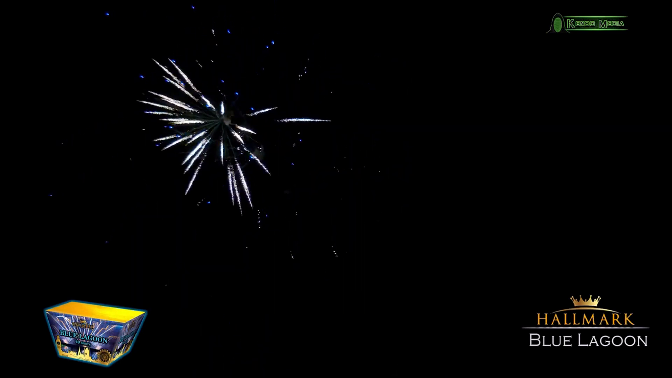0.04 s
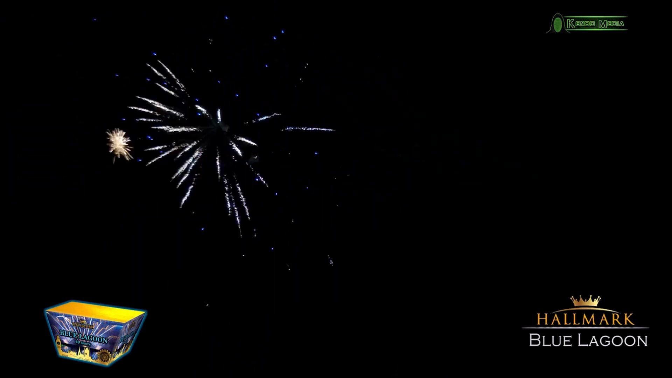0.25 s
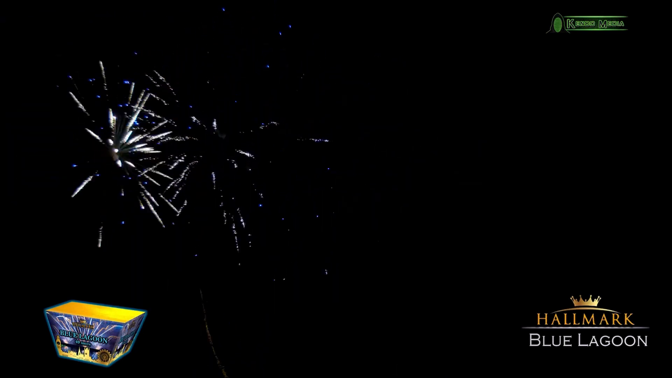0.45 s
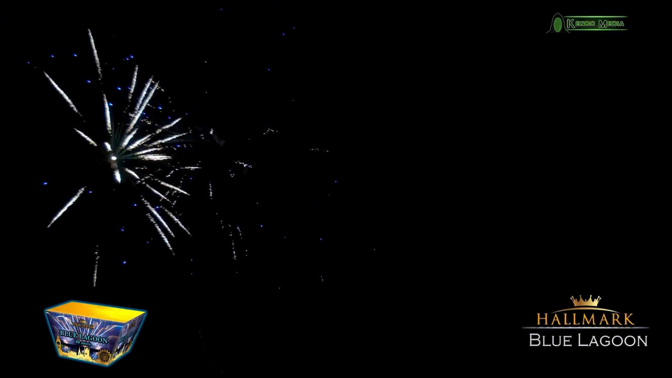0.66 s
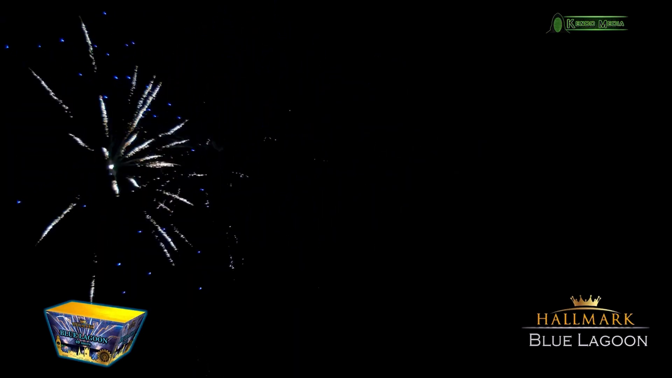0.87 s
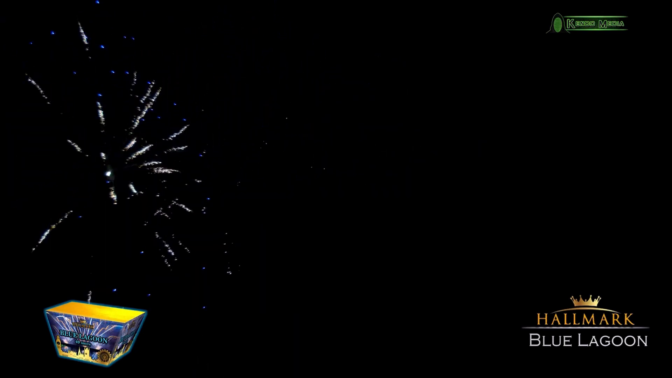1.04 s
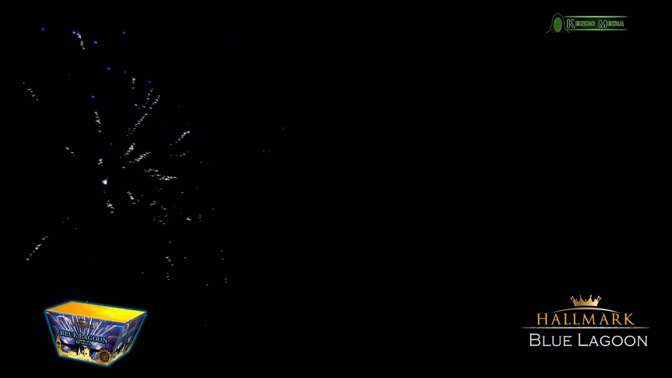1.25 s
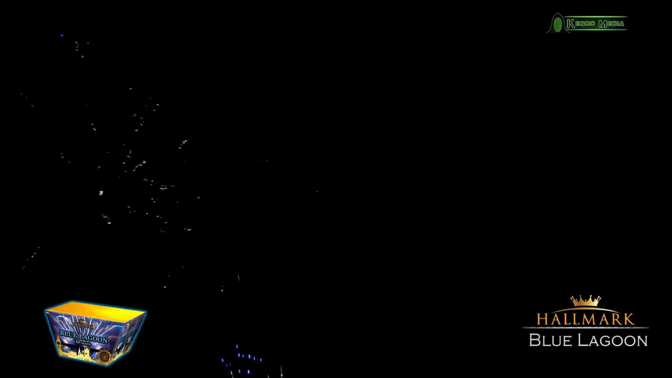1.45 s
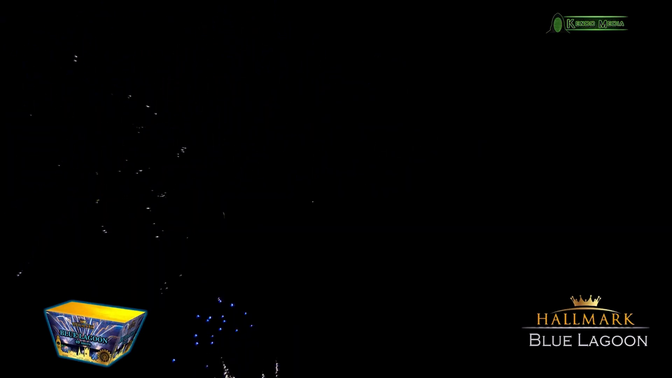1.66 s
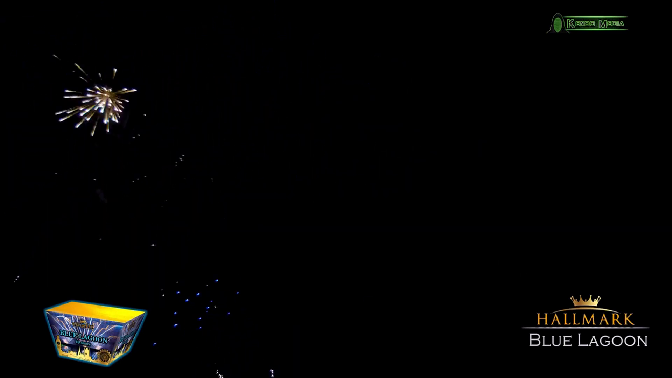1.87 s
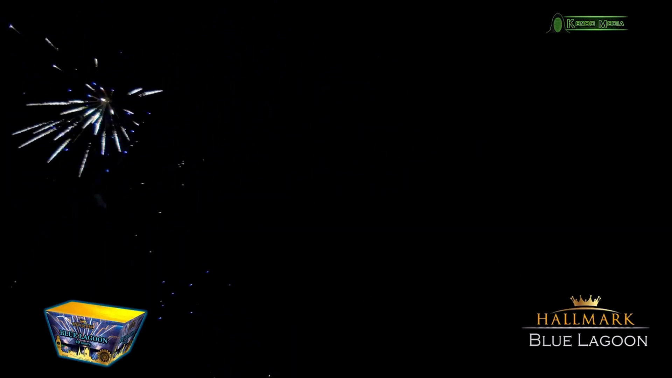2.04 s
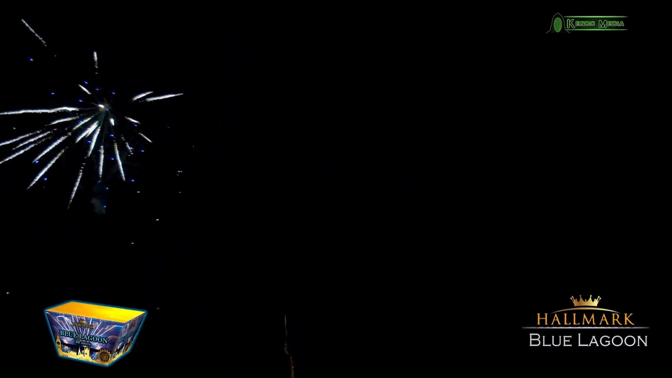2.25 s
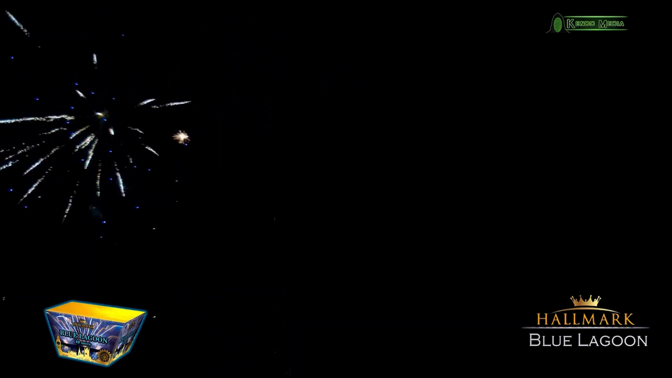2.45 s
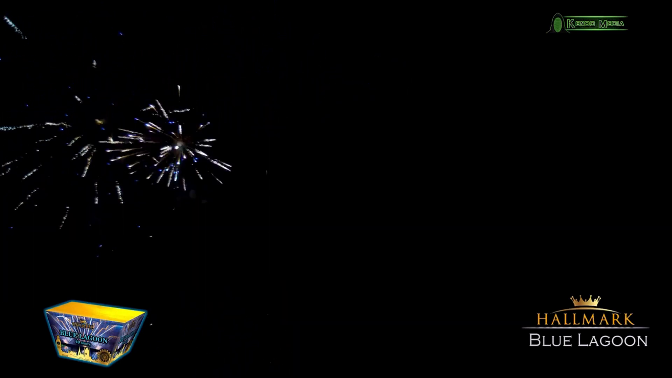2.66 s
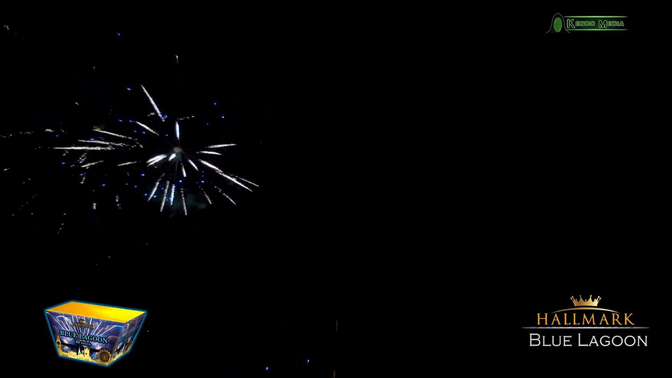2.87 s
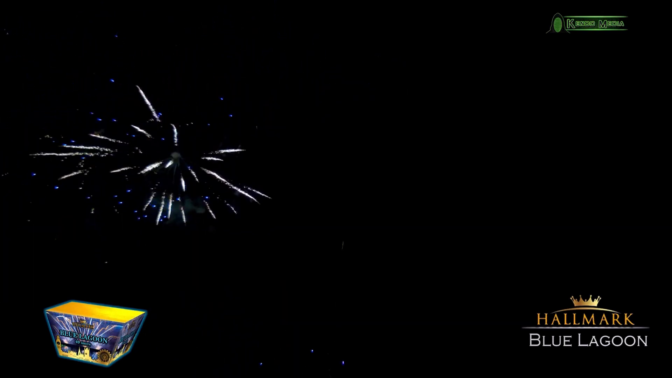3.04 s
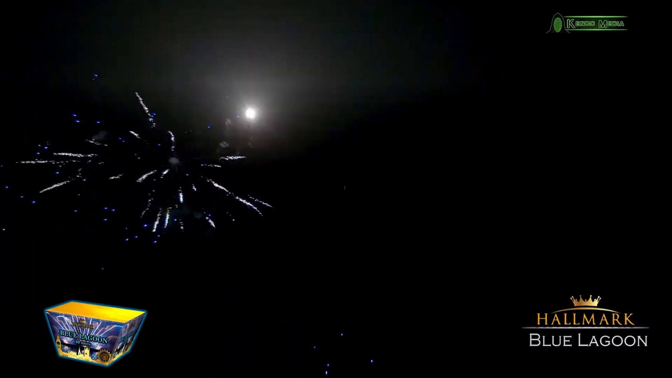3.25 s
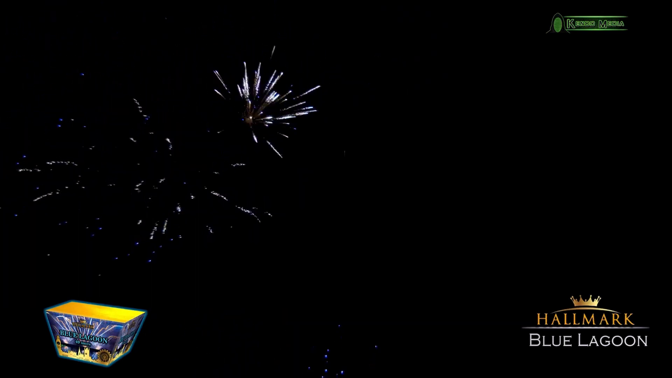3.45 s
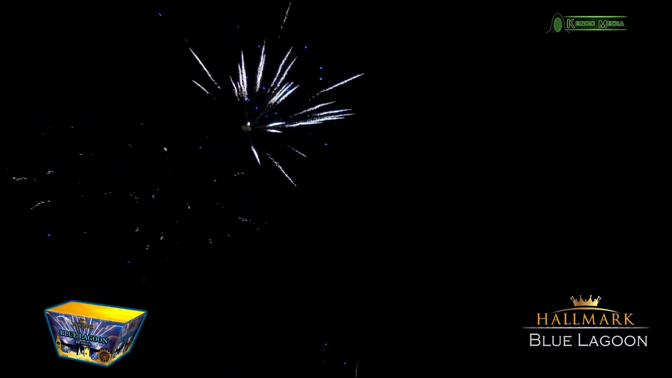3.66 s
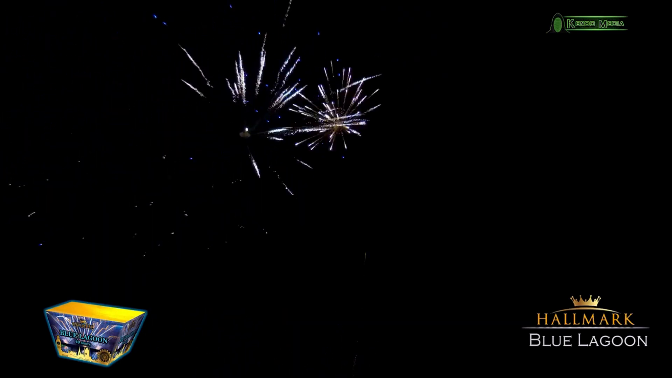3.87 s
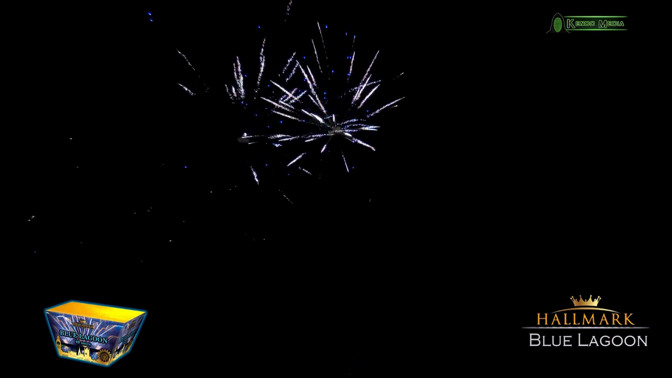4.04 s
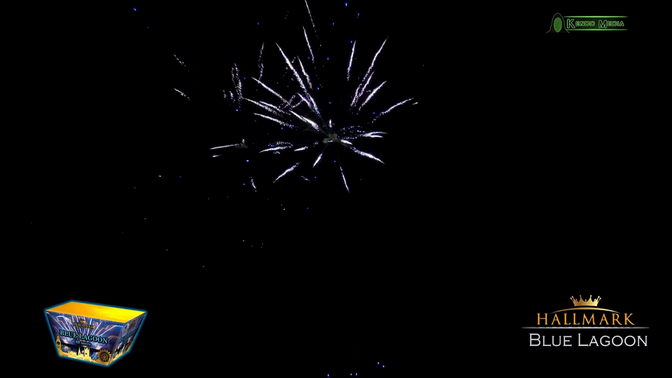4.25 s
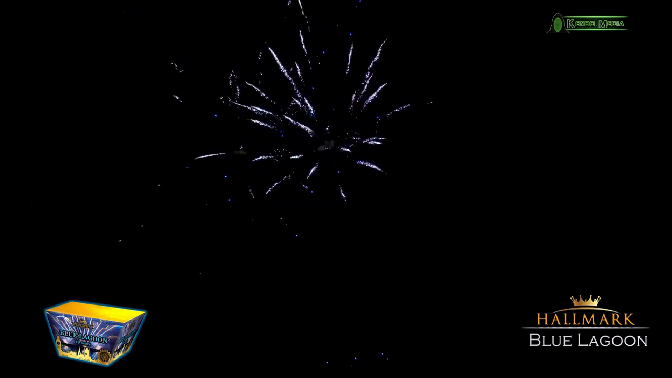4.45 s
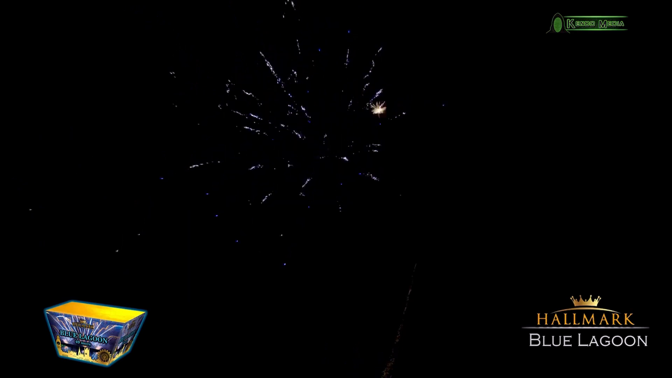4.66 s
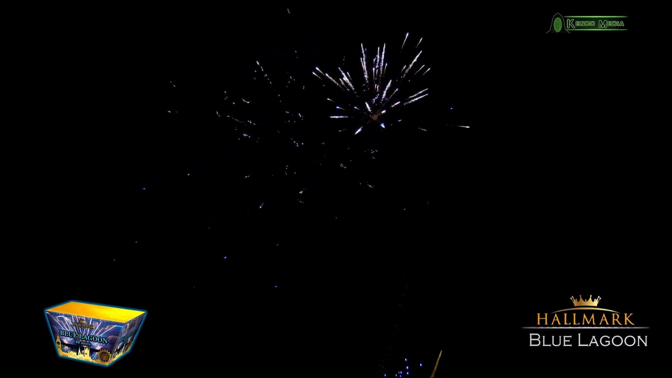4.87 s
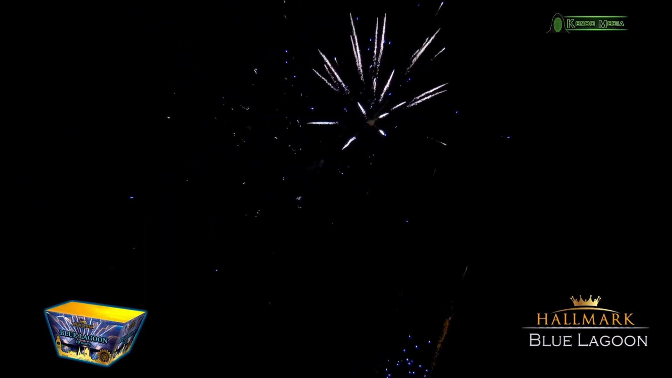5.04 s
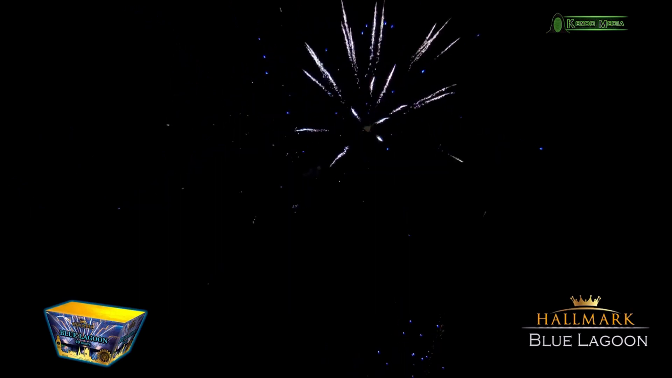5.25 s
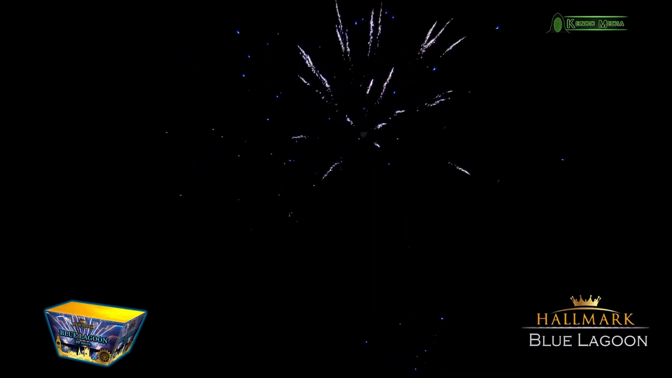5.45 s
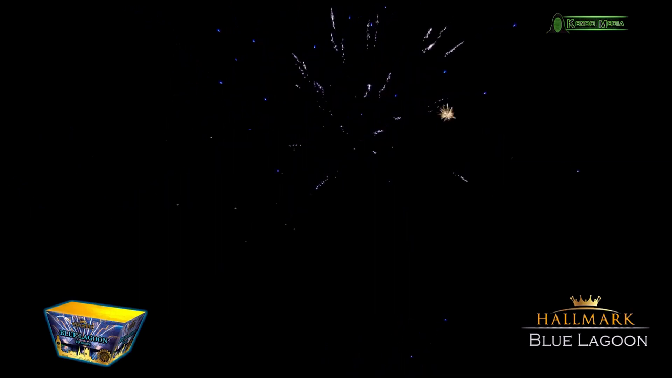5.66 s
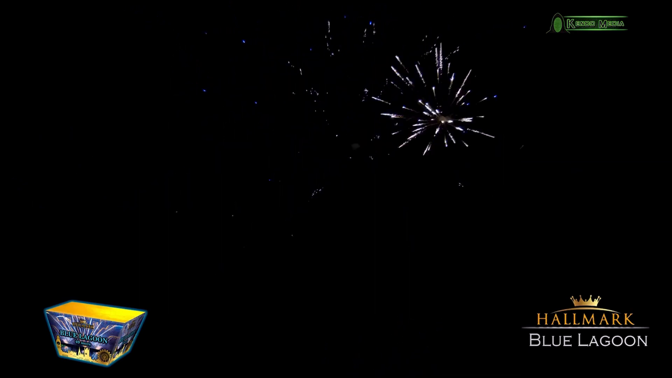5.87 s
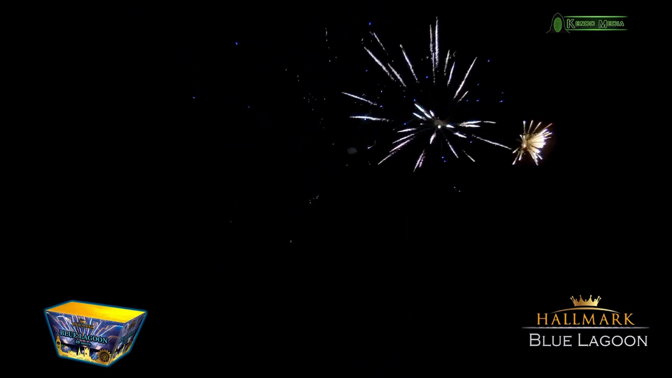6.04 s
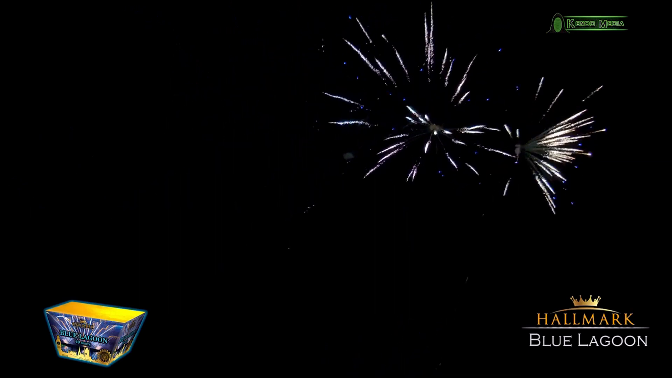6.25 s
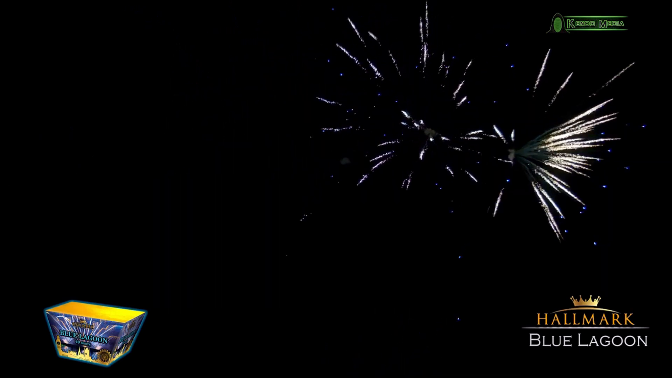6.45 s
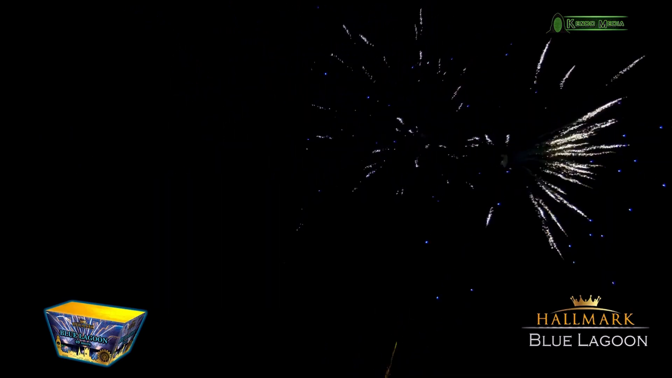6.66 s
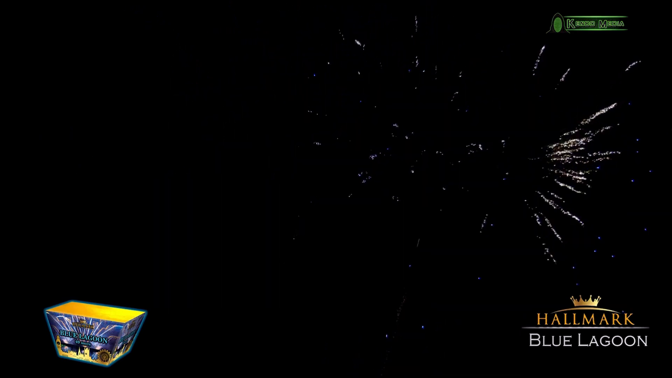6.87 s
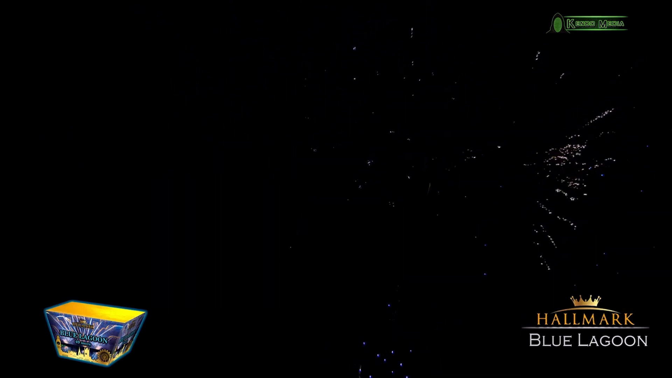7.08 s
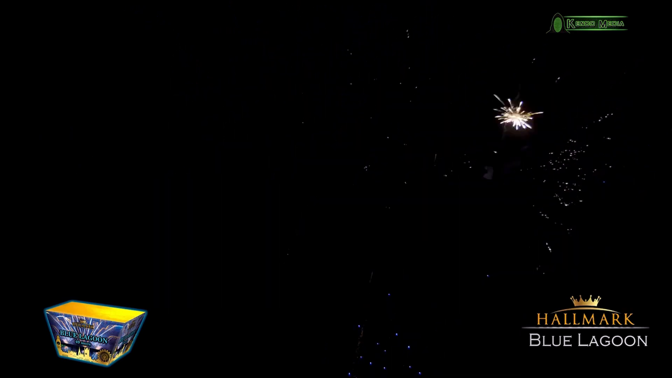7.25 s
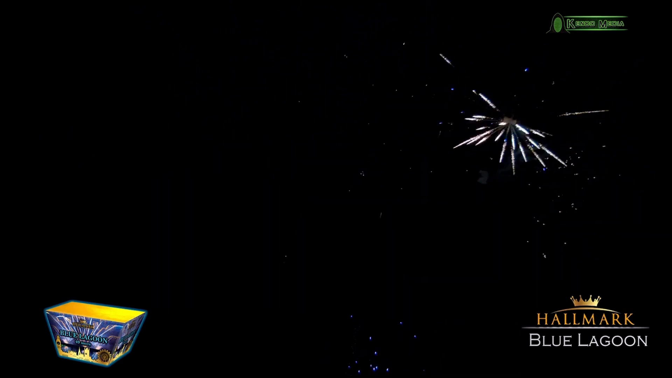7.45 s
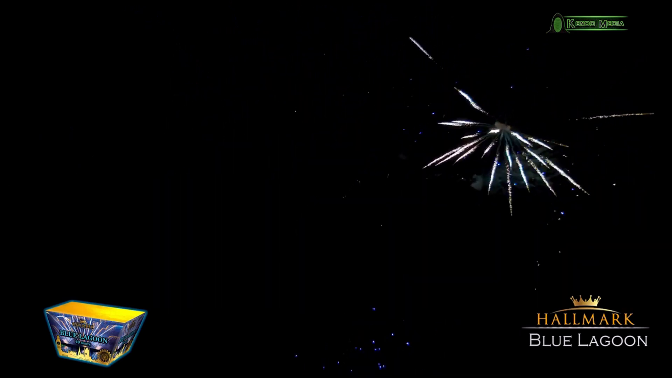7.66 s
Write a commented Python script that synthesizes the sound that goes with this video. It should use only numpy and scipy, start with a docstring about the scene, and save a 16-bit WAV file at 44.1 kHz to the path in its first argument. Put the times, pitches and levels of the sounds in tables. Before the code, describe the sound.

A multi-shot firework cake fires in an open field. Shells leave their tubes with hollow, cracking thumps and a faint upward swish, while others burst high overhead in sharp, loud bangs. The blasts come unevenly, often in quick pairs, each followed by a booming, hissing echo from ground and trees. Spent stars tick faintly and light wind rumbles on the low, widely spaced microphones, which overload on the loudest bangs.

```python
"""A field at night, three microphones 9 m apart and low over the grass, facing a firework cake.
A light wind rumbles, and ground and trees are still throwing back a burst as a hissing echo. Then a shell
thumps out of its tube and rushes upward; another bursts some 55 m overhead. Each blast reaches the
microphones in turn, a burst with its ground bounce; the loudest overload them, and all leave an echo.
Spent stars tick faintly as the cake fires on, its bursts fanning from left to right."""
import sys
import numpy as np
from scipy import signal
from scipy.fft import rfft, irfft, next_fast_len
from scipy.io import wavfile
from scipy.ndimage import map_coordinates

SR = 44100
rng = np.random.default_rng(int(sys.argv[2]) if len(sys.argv) > 2 else 0)


def dump_mix(stems):
    """Bounce the given channels to the path in sys.argv[1] as a 16-bit WAV at rate SR."""
    frames = np.atleast_2d(stems).T  # one column per channel
    limited = np.clip(frames, -1, 1)  # hard clip at full scale
    pcm = np.round(limited * 32767).astype(np.int16)
    wavfile.write(sys.argv[1], SR, pcm)


N = 340011

# shells bursting overhead:
# (time at the centre microphone [s], distance to the right [m], height [m], echo [dB])
BURSTS = [ (-0.115, -20, 56, -2), (0.5285, -24.5, 48, 1.5), (2.1141, -31.3, 61.5, -1.5),
          (2.7977, -19.9, 55.5, -1), (3.5769, -12, 61, -0.5), (4.0450, 0, 53, 0), (4.9812, 4.7, 60.5, 0),
          (5.9973, 13.3, 55.5, -1), (6.3048, 24, 56.5, 1), (7.5277, 22.6, 58, 0)]
# lift charges firing in the tubes:
# (time [s], thump [dB], thump pitch [Hz], crack [dB], echo [dB], swish pitch [Hz], swish [dB])
LIFTS = [ (0.4082, 3.5, 275, -2, 3.5, 2780, -53.5), (1.3507, 2.5, 263, -0.5, 3, 3000, -51),
         (2.195, 0.5, 282.4, -3.5, -1, 2530, -54.5), (2.8416, 3, 285.7, -2, 1.5, 2800, -58),
         (3.6945, 1, 274, -5.5, 0.5, 2400, -50.5), (4.5020, -1, 292, -7, -1, 2200, -55),
         (4.862, 1.5, 288, -2.5, 0.5, 2465, -48.5), (6.1305, 2.5, 290, -3, 4.5, 2190, -54.5),
         (6.6774, -0.5, 271, -4, 1, 2000, -56.5), (7.1102, 0.5, 284, -4.5, -0.5, 2080, -52)]
# what throws a blast back: close ground, nearest trees, deep wood, distant tree line, open country
# (delay [s], rise [s], hold [s], t60 [s], burst boom [dB], burst hiss [dB], lift boom [dB], lift hiss [dB])
REFLECTORS = [ (0, .001, 0.0039, .19, -19, -26.5, -25, -34.5),
              (0.0654, .005, 0.0065, .13, -28.5, -34.5, -37.5, -34.5),
              (0.083, .05, .085, .33, -39, -41, -50.5, -52),
              (.32, 0.018, .01, 0.28, -63, -58.5, -77.5, -81),
              (0.15, .1, 0.025, 1.8, -55.5, -56.5, -64, -67)]


def amp(db):
    """Decibels to gain."""
    return 10 ** (np.asarray(db) / 20)


def unit(x):
    """x at rms 1."""
    return x / np.sqrt(np.mean(x ** 2) + 1e-20)


def colour(points, hz):
    """Gain at hz of a curve of (frequency [Hz], level [dB]) points on a log axis."""
    knots_hz, db = np.transpose(points)
    return amp(np.interp(np.log(hz + 1), np.log(knots_hz + 1), db))


def filtered(x, response):
    """x with its spectrum multiplied by response(hz)."""
    size = x.shape[-1]
    padded = next_fast_len(size + 8192)
    return irfft(rfft(x, padded) * response(np.fft.rfftfreq(padded, 1 / SR)), padded)[..., :size]


def pole(x, hz, kind):
    """A causal first-order low-pass or high-pass."""
    return signal.lfilter(*signal.butter(1, hz, kind, fs=SR), x)


def noise(response, size, side_db, spiky=1):
    """Coloured stereo noise of rms 1; spiky above 1 gathers it into separate slaps."""
    white = rng.standard_normal((2, size))
    mid, side = filtered(np.sign(white) * np.abs(white) ** spiky, response)
    return unit(np.array([mid + amp(side_db) * side, mid - amp(side_db) * side]))


def wobble(per_s, size):
    """A smooth random curve through per_s knots a second."""
    knots = rng.standard_normal(int(size * per_s / SR) + 4)
    return map_coordinates(knots, [np.arange(size) * per_s / SR])


def overload(x, top, hardness):
    """Peaks flatten against a ceiling."""
    return x / (1 + np.abs(x / top) ** hardness) ** (1 / hardness)


def add(track, start_s, x):
    """Mix x into track from start_s, dropping what falls outside."""
    start = round(start_s * SR)
    first, end = max(start, 0), min(start + x.shape[-1], N)
    if end > first:
        track[..., first:end] += x[..., first - start:end - start]


def night_wind():
    """Wind rumbles at the microphones in gusts and quick buffets, over the faint hush of the field."""
    # gusts at the microphones: (time [s], level [dB])
    gusts = [(0.0, -44.5), (0.96, -48.5), (1.92, -42.5), (2.08, -49.5), (2.4, -39.5), (3.2, -48),
             (3.52, -53.5), (3.76, -49), (4.88, -54), (5.28, -49), (5.92, -50.5), (6.8, -46.5),
             (6.96, -40.5), (7.36, -45), (7.7, -54.6)]
    # spectrum of the wind rumble: (frequency [Hz], level [dB])
    rumble_colour = [(15, -13), (30, -6), (50, 0.5), (70, -1.5), (110, -12), (170, -22.5), (300, -39),
                     (900, -68.5)]
    # spectrum of the night air: (frequency [Hz], level [dB])
    air_colour = [(100, -9), (200, -4), (400, -10.5), (1200, -10.5), (3000, -22), (8000, -25.5),
                  (12000, -29.5), (16000, -38)]
    gust_db = np.interp(np.arange(N) / SR, *np.transpose(gusts))
    buffet_db = 2 * wobble(per_s=17, size=N)
    rumble = noise(lambda hz: colour(rumble_colour, hz), N, side_db=-9.5)
    hush = noise(lambda hz: colour(air_colour, hz), N, side_db=-8)
    return amp(gust_db + buffet_db) * rumble + amp(-66.5) * hush


def echo_envelope(t, levels_db):
    """Each reflector's answer swells, holds and dies away, and their powers add."""
    power = np.zeros(len(t))
    for (delay, rise, hold, t60, *_), db in zip(REFLECTORS, levels_db):
        swell = np.exp(-(np.minimum(t - delay, 0) / rise) ** 2)
        release = amp(-60 * np.maximum(t - delay - hold, 0) / t60)
        power += (amp(db) * swell * release) ** 2
    return np.sqrt(power)


def echo(boom_db, hiss_db, spectrum, ragged_db, clump_db):
    """Ground and trees scatter a blast back as a low boom and a hiss; both dull with distance."""
    length_s, rattle_s, dulling_s = 1.1, .06, .39
    crossover_hz, rattle_low_hz, thud_top_hz, air_top_hz = 1000, 260, 810, 8500
    t = np.arange(int(length_s * SR)) / SR
    lows = lambda hz: 1 / (1 + (hz / crossover_hz) ** 4)
    # the ground answers with a dense rattle, the trees with separate round thuds
    rattle_band = lambda hz: colour(spectrum, hz) * lows(hz) * hz / (hz + rattle_low_hz)
    thud_band = lambda hz: colour(spectrum, hz) / (1 + (hz / thud_top_hz) ** 4)
    rattle = noise(rattle_band, len(t), side_db=-7, spiky=1.5)
    thuds = noise(thud_band, len(t), side_db=-7, spiky=4.5)
    near = np.exp(-t / rattle_s)
    boom = np.sqrt(near) * rattle + np.sqrt(1 - near) * thuds
    # late echoes have crossed more air and lost their treble
    bright = noise(lambda hz: colour(spectrum, hz) * (1 - lows(hz)), len(t), side_db=-8, spiky=2.1)
    dull = unit(filtered(bright, lambda hz: np.exp(-(hz / air_top_hz) ** 2)))
    far = np.clip(t / dulling_s, 0, 1)
    hiss = (1 - far) * bright + far * dull
    # single trunks roughen the echo, clumps of trees make it swell and sink
    scatter = amp(ragged_db * wobble(130, len(t)) + clump_db * wobble(32, len(t)))
    return scatter * (boom * echo_envelope(t, boom_db) + hiss * echo_envelope(t, hiss_db))


def echoes():
    """Every blast wakes its own echo from the same ground and trees."""
    # spectrum of a burst's echo: (frequency [Hz], level [dB])
    burst_colour = [(41, -29.5), (70, -4), (155, -4), (190, -4), (321, -1), (977, -15.5), (1510, -14.5),
                    (1890, -18.5), (2270, -18.5), (3040, -20), (7220, -22), (12500, -30.5), (16000, -42.5)]
    # spectrum of a lift charge's echo: (frequency [Hz], level [dB])
    lift_colour = [(59, -36.5), (100, -3.5), (234, -3), (302, -2.5), (335, -2.5), (471, -14.5),
                   (1200, -24.5), (1950, -15), (2520, -16), (3700, -13.5), (4200, -17.5), (6700, -15.5),
                   (11900, -23), (16000, -39)]
    out = np.zeros((2, N))
    *_, burst_boom_db, burst_hiss_db, lift_boom_db, lift_hiss_db = np.transpose(REFLECTORS)
    for time_s, *_, echo_db in BURSTS:
        tail = echo(burst_boom_db, burst_hiss_db, burst_colour, ragged_db=-.12, clump_db=1.2)
        add(out, time_s, amp(echo_db) * tail)
    for time_s, *_, echo_db, _, _ in LIFTS:
        tail = echo(lift_boom_db, lift_hiss_db, lift_colour, ragged_db=.6, clump_db=1.13)
        add(out, time_s, amp(echo_db) * tail)
    return out


def lifts():
    """The gas leaving a tube swings for a cycle or two under a sharp crack and a short sizzle."""
    # the cake at the left, centre and right microphone: (lag [ms], thump [dB], crack [dB], sizzle [dB])
    cake_at_mics = [(5, -2, 4, -11), (0.5, 2.5, -3.5, -12.5), (8, -4, -2.5, -8.5)]
    # spectrum of the crack at the muzzle: (frequency [Hz], level [dB])
    muzzle_colour = [(400, -8), (1100, -15.5), (1800, -2.5), (2800, 4.5), (5000, -4.5), (7500, -2),
                     (10000, -10), (15000, -14.5)]
    mics, t = np.zeros((3, N)), np.arange(SR // 16) / SR
    gas = lambda: unit(filtered(rng.standard_normal(len(t)), lambda hz: colour(muzzle_colour, hz)))
    for time_s, thump_db, thump_hz, crack_db, *_ in LIFTS:
        add(mics[1], time_s - .0025, amp(-32.5 - 60 * t / .053) * gas())  # a faint sizzle of the burning fuse leads in just before
        for mic, (lag_ms, near_db, sharp_db, sizzle_db) in zip(mics, cake_at_mics):
            phase = 2 * np.pi * thump_hz * np.exp(rng.normal(0, .1)) * t
            swing = np.sin(phase + .66) * amp(-60 * t / .016)
            tube = np.sin(1.75 * phase + .091) * amp(-10 - 60 * t / .011)  # hollow note of the cardboard
            crack = gas() * (amp(sharp_db - 60 * t / .0044) + amp(sizzle_db - 60 * t / .02))
            place_ms = rng.normal(0, .17) * (lag_ms > 0)  # each tube has its own place in the cake
            blast = amp(thump_db + near_db) * (swing + tube) + amp(crack_db) * crack
            add(mic, time_s + (lag_ms + place_ms) / 1000, blast)
    return mics


def swishes():
    """A climbing shell rushes through the air for a quarter of a second."""
    out, t = np.zeros((2, N)), np.arange(SR // 2) / SR
    swell = np.exp(-((t - .15) / .066) ** 2)
    # spectrum of the rush: (frequency [multiples of the swish pitch], level [dB])
    shape = [(.25, -40), (.6, -14), (.8, -1), (1, 0), (1.5, -5), (2.5, -16), (6, -40)]
    for time_s, *_, swish_hz, swish_db in LIFTS:
        rush_colour = [(ratio * swish_hz, db) for ratio, db in shape]
        rush = noise(lambda hz: colour(rush_colour, hz), len(t), side_db=-8.5)
        add(out, time_s, amp(swish_db) * swell * rush)
    return out


def shock(push_ms, pull_ms, pull, sag, grit_db, grit_t60):
    """A burst's pressure wave: a jump and a fall into a sagging suction, with the rasp of torn casing."""
    t = np.arange(SR // 16) / SR
    knots_ms = np.cumsum([0, push_ms, pull_ms / 4, pull_ms / 2, pull_ms / 4])
    wave = np.interp(t * 1000, knots_ms, [1, 0, -pull, -pull * sag, 0], right=0)
    grit = unit(pole(rng.standard_normal(len(t)), 1500, "low"))
    return wave + amp(grit_db - 60 * t / grit_t60) * grit


def bursts():
    """Each shock travels straight to each microphone, and by a longer way off the ground."""
    # where the left, centre and right microphone stand: (distance to the right [m], height [m])
    mic_places = [(-9, 1.06), (0, .3), (9, 1.06)]
    # a burst at the left, centre and right microphone: (direct [dB], ground bounce [dB])
    burst_at_mics = [(11.5, 4.5), (5.5, 5), (9.5, 2.5)]
    sound_m_per_s = 343
    mics = np.zeros((3, N))
    for time_s, right_m, height_m, _ in BURSTS:
        flight_s = lambda x, z: np.hypot(x - right_m, z - height_m) / sound_m_per_s
        burst_s = time_s - flight_s(*mic_places[1])
        for mic, (x, z), (direct_db, bounce_db) in zip(mics, mic_places, burst_at_mics):
            stretch = np.exp(rng.normal(0, .063))  # the air bends every path a little differently
            direct = shock(.47 * stretch, 1.25 * stretch, pull=.6, sag=.75, grit_db=-30, grit_t60=.028)
            # grass draws the bounce out and roughens it
            bounce = shock(.61 * stretch, 1.6 * stretch, pull=.81, sag=.53, grit_db=-20.5, grit_t60=.03)
            add(mic, burst_s + flight_s(x, z), amp(direct_db) * direct)
            add(mic, burst_s + flight_s(x, -z), amp(bounce_db) * bounce)
    return mics


def star_ticks():
    """Spent stars pop faintly, each a quickly dying puff of noise."""
    # the pops: (time [s], level [dB])
    pops = [(1.2111, -53), (1.2351, -47), (1.2565, -43.5), (3.477, -49), (3.5, -44.5), (5.5967, -51),
            (5.6411, -46.5), (5.8647, -57.5), (6.6199, -47), (6.9162, -42)]
    # spectrum of a pop: (frequency [Hz], level [dB])
    pop_colour = [(300, -32), (900, -1), (1600, 4), (3000, -6), (6000, -27), (14000, -32.5)]
    out, t = np.zeros((2, N)), np.arange(SR // 8) / SR
    for time_s, db in pops:
        puff = noise(lambda hz: colour(pop_colour, hz), len(t), side_db=-7)
        add(out, time_s, amp(db - 6 - 60 * t / .0384) * puff)
    return out


def scene():
    """Each microphone overloads on its own, recovers with a slow swing, and is panned to its place."""
    spill, balance_db = .45, [[.35], [-.35]]
    mics = overload(bursts() + lifts(), top=1.22, hardness=6)
    softened = pole(mics, 15000, "low")
    left, centre, right = pole(softened, 27, "high")
    blasts = np.array([left + centre + spill * right, right + centre + spill * left])
    return (blasts + echoes() + swishes() + star_ticks() + night_wind()) * amp(balance_db)


def record(dry):
    """The mix clips just under full scale and loses the treble above the recorder's band limit."""
    top_hz = 15700
    clipped = overload(dry, top=.98, hardness=10)
    return filtered(clipped, lambda hz: 1 / np.sqrt(1 + (hz / top_hz) ** 140))


dry = scene()
out = record(dry)
dump_mix(out)
```